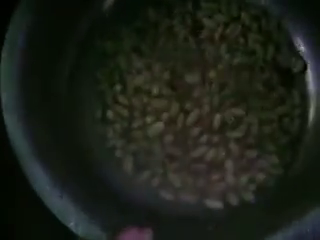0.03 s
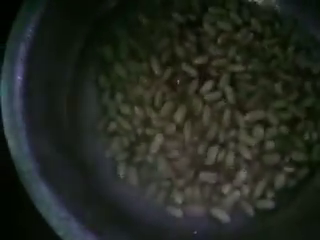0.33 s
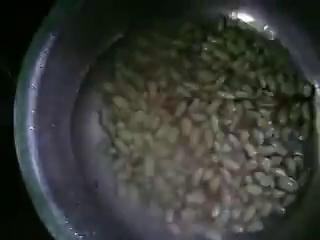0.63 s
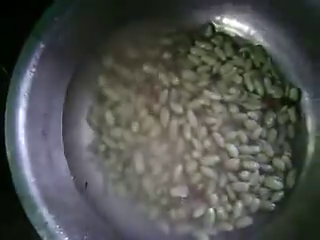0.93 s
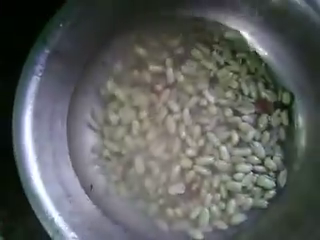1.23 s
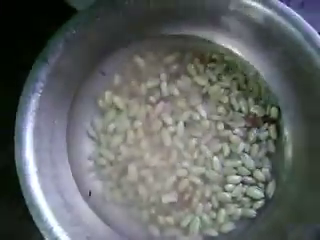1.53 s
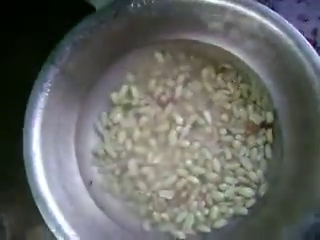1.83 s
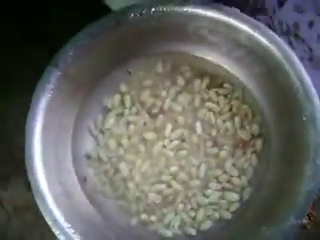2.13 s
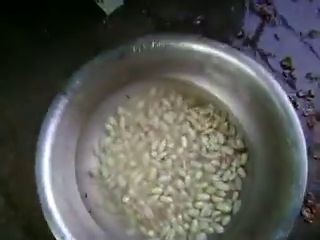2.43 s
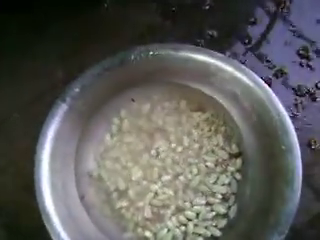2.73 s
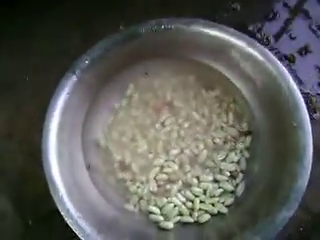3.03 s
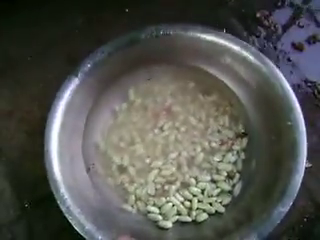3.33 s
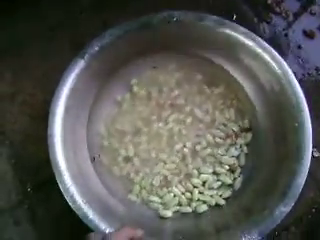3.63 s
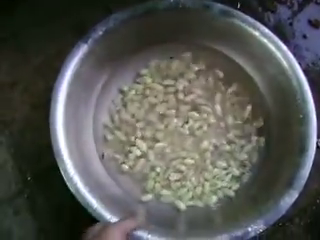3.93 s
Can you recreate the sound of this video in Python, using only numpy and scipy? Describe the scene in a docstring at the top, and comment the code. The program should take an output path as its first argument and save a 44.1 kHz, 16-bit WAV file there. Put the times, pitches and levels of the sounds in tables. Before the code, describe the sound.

Loud, distorted churning of a bean peeling machine fades to soft ringing, followed by hard knocks.

```python
"""A bean peeling machine churns a wet load in its steel drum, loud enough to overload a small camera.
Beans pelt the wall, wet skins squeak, and the rubbed steel sings and squeals in narrow modes.
As the load thins out, the rotor is left scraping and knocking once a turn, and the drum rings ever
more softly. Water hisses in the workshop, and a few hard knocks sound close by near the end."""
import sys
import numpy as np
from scipy import signal
from scipy.fft import rfft, irfft, next_fast_len
from scipy.io import wavfile

SR = 44100
rng = np.random.default_rng(int(sys.argv[2]) if len(sys.argv) > 2 else 0)


def wav_record(signal):
    """Record a signal, one row per channel, as 16-bit PCM in the file named by sys.argv[1]."""
    frames = np.transpose(np.atleast_2d(signal))
    bounded = np.clip(frames, -1, 1)
    # unit amplitude maps onto the largest positive 16-bit level
    quanta = np.round(bounded * 32767).astype(np.int16)
    wavfile.write(sys.argv[1], SR, quanta)


N = 176400
T = np.arange(N) / SR
TURNS_PER_S, KNOCK_AT_S = 19.77, 2.136  # rotor speed; the time of one of its knocks


def amp(db):
    """Decibels to gain."""
    return 10 ** (np.asarray(db) / 20)


def unit(x):
    """Scales to rms 1."""
    return x / np.sqrt(np.mean(x ** 2) + 1e-20)


def curve(rows, column=1):
    """An automation lane: one column of a table, joined by straight lines in time."""
    rows = np.array(rows)
    return np.interp(T, rows[:, 0], rows[:, column])


def hump(start, length):
    """A rounded swell and fade."""
    return np.sqrt(abs(np.sin(np.pi * np.clip((T - start) / length, 0, 1))))


def colour(x, points):
    """An EQ drawn through (f/Hz, level/dB) points."""
    hz, db = np.transpose(points)
    size = next_fast_len(len(x) + 4096)
    f = np.fft.rfftfreq(size, 1 / SR)
    gain = amp(np.interp(np.log(f + 1), np.log(hz + 1), db))
    return irfft(rfft(x, size) * gain, size)[:len(x)]


def drift(rate_hz):
    """Smooth random modulation of about rms 1."""
    f, grid = np.fft.rfftfreq(4096, 1 / 1000), np.arange(4096) / 1000
    lowpass = np.exp(-(f / rate_hz) ** 2) * (f > 0)
    slow = irfft(rfft(rng.standard_normal(len(grid))) * lowpass)
    return np.interp(T, grid, unit(slow))


def resonate(x, hz, width_hz):
    """A resonance, steady or gliding."""
    carrier = np.exp(2j * np.pi * np.cumsum(hz * np.ones(len(x))) / SR)
    pole = np.exp(-np.pi * width_hz / SR)
    return 2 * (carrier * signal.lfilter([1 - pole], [1, -pole], x / carrier + 1e-18)).real


def add(mix, start, sound):
    """Mixes a sound in at a time in seconds."""
    part = mix[round(start * SR):][:len(sound)]
    part += sound[:len(part)]


def patter(per_s, spread_db, share):
    """Tiny impacts of uneven size over a hiss; share is their part of the power."""
    sizes = amp(spread_db * np.minimum(rng.exponential(1, N), 4))
    hits = sizes * rng.choice([-1, 1], N) * (rng.random(N) < per_s / SR)
    return np.sqrt(share) * unit(hits) + np.sqrt(1 - share) * rng.standard_normal(N)


def water():
    """The workshop's bed of wet hiss, with a few bright swishes and dull sloshes."""
    # spectra of the three water layers: f/Hz, level/dB
    swish_eq = [(100, -23), (1500, -5), (2500, 1), (3500, 0), (4800, 7.5), (6000, -3)]
    slosh_eq = [(80, -24), (300, -14), (620, -3), (1100, -2), (1700, -11), (3000, -19), (6000, -19)]
    bed_eq = [(20, -2), (130, -4), (220, -5), (420, -3), (650, -6), (1150, 0), (1500, -5.5), (2400, -4.5),
              (3200, -6), (6000, -8)]
    # swells of water: t/s, length/s, level/dB
    swishes = [(3.087, .13, -40), (3.296, 0.076, -36), (3.678, .05, -35), (3.738, 0.073, -35.5),
               (3.93, .11, -33.5)]
    sloshes = [(3.102, .04, -36), (3.552, .055, -36), (3.749, 0.055, -35.5)]
    spray = unit(colour(patter(per_s=2500, spread_db=5, share=.4), swish_eq))
    slosh = unit(colour(rng.standard_normal(N), slosh_eq))
    bed = unit(colour(patter(per_s=1700, spread_db=4, share=.3), bed_eq))
    return (spray * sum(amp(db) * hump(start, length) for start, length, db in swishes)
            + slosh * sum(amp(db) * hump(start, length) for start, length, db in sloshes)
            + bed * amp(-39 + drift(rate_hz=15)))


def knocks():
    """Close, hard knocks: a dull push and a sharp click, then a short ring and the room's answer."""
    # hits: t/s, blow level/dB, tail level/dB
    hits = [(3.132, -20, -30), (3.205, -23, -32), (3.438, -5.5, -18.5), (3.545, -10, -23),
            (3.787, -22, -34), (3.819, -16.5, -28)]
    # modes of the ring: f/Hz, relative level/dB, t60/s
    modes = [(210, -11, 0.16), (434, -9, 0.062), (640, -5, 0.098), (800, 4, 0.032), (1200, -6, 0.071),
             (1970, -2, .04), (2620, 1.5, 0.051), (2810, -3, 0.039), (4188, -16, .08)]
    # spectrum of the room's answer: f/Hz, level/dB
    room_eq = [(60, -26), (200, -1), (900, 0), (1600, -15), (3000, -12), (6000, -13.5)]
    push_s, click_delay_s, click_s = .00027, .00065, .00008
    out, t = np.zeros(N), np.arange(SR // 3) / SR
    push = np.exp(-(t / push_s - 1) ** 2)
    click = np.exp(-((t - push_s - click_delay_s) / click_s) ** 2)
    blow = click - .48 * push
    attack = np.minimum(t / .0019, 1)
    for start, blow_db, tail_db in hits:
        ring = sum(amp(db - 60 * t / t60) * np.sin(2 * np.pi * (hz * t + rng.random()))
                   for hz, db, t60 in modes)
        room = unit(colour(rng.standard_normal(len(t)), room_eq)) * amp(-60 * t / .09)
        tail = (amp(-5) * ring + amp(-3) * room) * attack
        add(out, start, amp(blow_db) * blow + amp(tail_db) * tail)
    return signal.sosfilt(signal.butter(2, 150, "high", fs=SR, output="sos"), out)


def squeaks():
    """Wet skins slip on the steel in short rough glides."""
    # slips: t/s, length/s, start f/Hz, end f/Hz, level/dB
    slips = [(1.5, 0.023, 2110, 2650, -20), (1.585, 0.035, 1910, 1520, -14.5),
             (1.852, .014, 2040, 1900, -16), (1.864, 0.013, 1770, 1340, -24)]
    out = np.zeros(N)
    for start, length, from_hz, to_hz, db in slips:
        progress = np.linspace(0, 1, int(length * SR))
        glide_hz = from_hz + (to_hz - from_hz) * progress
        slip = resonate(rng.standard_normal(N)[:len(progress)], glide_hz, width_hz=91)
        add(out, start, amp(db) * unit(slip) * np.sin(np.pi * progress))
    return out


def throb():
    """A pulsing gain: once a turn the rotor grabs quickly and lets go gradually."""
    # pulse depth, negative flips the pulse: t/s, depth/dB
    depth = [(0, -9), (1.6, 10), (1.8, 8), (2.05, 13.5), (2.3, 5), (3, 8), (4, -2)]
    lead_turns, rise_turns = .25, .18  # the grab starts ahead of the knock
    phase = ((T - KNOCK_AT_S) * TURNS_PER_S + lead_turns) % 1
    grip = np.minimum(phase / rise_turns, 1) * (1 - phase ** 2)
    return amp(curve(depth) * (grip - .72))


def sing(hz, waver_hz):
    """A rubbed mode of rms 1, unsteady in pitch and strength."""
    cycles = np.cumsum(hz + waver_hz * drift(rate_hz=29.5)) / SR + rng.random()
    return unit(np.sin(2 * np.pi * cycles) * amp(1.7 * drift(rate_hz=45)))


def squeals():
    """Now and then the rubbing catches one mode and holds it briefly."""
    # swelling modes: t/s, length/s, f/Hz, waver/Hz, level/dB
    catches = [(0.04, 0.5, 949, 4.8, -19), (0.163, 0.037, 2177, 12, -17), (0.187, 0.13, 3125, 11.5, -24),
               (0.335, 0.34, 1800, 15.6, -19), (0.398, 0.54, 1876, 28.4, -22.5),
               (0.757, 0.41, 1803, 12, -21.5), (0.848, 0.12, 2728, 7.1, -20),
               (1.266, 0.076, 3182, 12.3, -19.5), (1.302, 0.12, 985, 18.5, -17.5),
               (1.656, 0.074, 1218, 7.6, -20), (1.718, 0.25, 859, 7.4, -26), (1.867, .11, 3750, 5.6, -29.5),
               (2.05, 0.28, 1179, 2.1, -30.5), (2.375, 0.14, 2481, 2.3, -38), (2.46, 0.13, 3650, 3.5, -41),
               (2.55, .45, 1182, 2, -40), (2.944, 0.41, 1061, 2.6, -43.5), (3.55, 0.4, 215.6, 3, -53.5)]
    tones = sum(sing(hz, waver) * amp(db) * hump(start, length)
                for start, length, hz, waver, db in catches)
    return tones * throb() ** .27


def drum():
    """The rubbed steel sings in narrow modes; their balance shifts as the load thins."""
    # drum modes: f/Hz
    mode_hz = [215, 307, 366, 436, 522, 613, 872, 943, 972, 1061, 1179, 1208, 1783, 2157, 2482, 2654, 2727,
               3090, 3298, 3651, 3747, 4371]
    # for each mode: waver/Hz, then relative level/dB when loaded, emptying, nearly empty
    modes = [(6, -46, -48, -61.5), (4, -47, -42, -51.5), (4, -31, -53.5, -52), (8.1, -26, -42.5, -63),
             (6, -38, -40, -64.5), (6.7, -30.5, -38.5, -51), (8, -38, -37, -64.5), (9.28, -28, -39.5, -60),
             (9, -27.5, -47, -49), (7.5, -32, -47, -47.5), (2.67, -38.5, -33.5, -51.5),
             (6.2, -41, -38, -57), (9, -38, -53, -66), (5.8, -34.5, -50, -53), (6, -33, -44, -55),
             (2.9, -44.5, -42.5, -53.5), (2.2, -35, -43, -51.5), (2.1, -46.5, -44, -76),
             (5, -36, -45.5, -56), (1.2, -44, -43, -69), (3.3, -41.5, -43.5, -58), (4, -44, -51.5, -58)]
    # crossfade of those states: t/s, then drive/dB for loaded, emptying, nearly empty
    drive = [(0, 2.5, -20, -10), (1.0, 4.5, -6, -10), (1.6, 5, -12, -14), (1.7, -3.5, 9.5, -11),
             (1.93, 0.5, 6.5, -8), (2.15, -22, 6, 4), (2.45, -34.5, -3, 6.5), (2.85, -42, -19, 5.5),
             (3.25, -45, -28, 1), (3.55, -46, -32, -4.5), (4, -50, -37, -11)]
    state_power = amp([curve(drive, column) for column in (1, 2, 3)]) ** 2
    ring = sum(sing(hz, waver) * np.sqrt(amp(state_db) ** 2 @ state_power)
               for hz, (waver, *state_db) in zip(mode_hz, modes))
    return ring * throb() ** .5 * amp(-1)


def rotor_knock():
    """A short dull tap at each turn, with a faint tick on top."""
    # fader of the tapping: t/s, level/dB
    fader = [(0, -34), (2.0, -33.5), (2.15, -34.5), (2.3, -36), (2.6, -41), (3.0, -63), (3.4, -55),
             (4, -55)]
    # low cut of each tap: f/Hz, level/dB
    low_cut = [(30, -43), (200, -14), (400, -3), (6000, -1)]
    thud_hz, width_hz = 632, 265
    turns = np.floor((T - KNOCK_AT_S) * TURNS_PER_S)
    impulses = np.diff(turns, prepend=turns[0])
    taps = colour(impulses * amp(1.6 * drift(rate_hz=20)), low_cut)
    thud = unit(resonate(resonate(taps, thud_hz, width_hz), thud_hz, width_hz))
    tick = unit(resonate(taps, hz=2430, width_hz=1800))
    return (thud + .5 * tick) * amp(curve(fader))


def scrape():
    """The rotor rubs the drum: grit that pulses with each turn."""
    # fader of the scraping: t/s, level/dB
    fader = [(0, -13), (1.6, -20), (1.645, -23), (1.675, -15), (1.76, -18.5), (1.93, -16.5), (1.99, -21),
             (2.06, -23.5), (2.095, -19), (2.15, -22), (2.3, -23.5), (2.6, -29.5), (2.74, -30.5),
             (2.84, -29), (3.06, -35), (3.2, -34), (3.4, -38), (3.58, -38), (3.66, -45), (4, -41)]
    # spectrum of the grit: f/Hz, level/dB
    grit_eq = [(30, -30), (120, -15), (230, -8.5), (330, -3), (600, -2), (1000, -2), (1240, -6),
               (1380, -12), (2000, -11), (2350, -0.5), (2750, -8.5), (3000, -7), (3800, -8.5), (5200, -11)]
    grit = unit(colour(patter(per_s=700, spread_db=.5, share=.58), grit_eq))
    return grit * throb() * amp(curve(fader) + .8 * drift(rate_hz=16))


def cavity(x, t60, wet_db):
    """Short dense echoes between the steel walls."""
    t = np.arange(SR // 6) / SR
    tail = rng.standard_normal(len(t)) * amp(-60 * t / t60)
    return x + amp(wet_db) * signal.oaconvolve(x, tail / np.linalg.norm(tail))[:N]


def churn():
    """Beans pelt the drum wall in swirling water."""
    # fader of the thinning load: t/s, level/dB
    fader = [(0, -7.5), (.65, -7.5), (1.25, -9), (1.6, -8.5), (1.65, -15), (1.87, -20.5), (2.0, -26.5),
             (2.3, -33), (2.7, -41), (3.4, -51), (4, -44.5)]
    # spectrum of the wet load: f/Hz, level/dB
    load_eq = [(20, -12.5), (80, -11), (150, -7), (240, -0.5), (380, -4.5), (530, -5.5), (720, -1.5),
               (980, 0), (1200, -2.5), (1450, -6.5), (1850, -4), (2500, -6.5), (3000, -9.5), (5200, -12),
               (6500, -16.5)]
    beans = patter(per_s=1500, spread_db=2, share=.38)
    load = unit(colour(cavity(beans, t60=.07, wet_db=-13), load_eq))
    return load * amp(curve(fader) + .8 * drift(rate_hz=49))


def scene():
    """Machine, water and knocks in one mono mix."""
    machine = churn() + scrape() + rotor_knock() + drum() + squeals() + squeaks()
    return (machine + water() + knocks())[None]


def record(dry):
    """A narrow-band camera overloads: its converter clips, and its output stage shaves the overshoot."""
    # treble roll-off before and after the converter: f/Hz, level/dB
    input_eq = [(10, 1.5), (5900, 0), (6400, -11), (7200, -80)]
    output_eq = [(10, -1.5), (5100, 0), (5450, -3.5), (5750, -11.5), (6050, -21), (6400, -59), (7000, -92)]
    clip_level, ceiling, edge_hz = .78, .7, 15900
    crunched = np.clip(colour(dry[0], input_eq), -clip_level, clip_level)
    shaved = np.clip(colour(crunched, output_eq), -ceiling, ceiling)
    band_limit = signal.firwin(511, edge_hz, window=("kaiser", 9), fs=SR)
    return signal.oaconvolve(shaved, band_limit, "same")[None]


dry = scene()
out = record(dry)
wav_record(out)
```